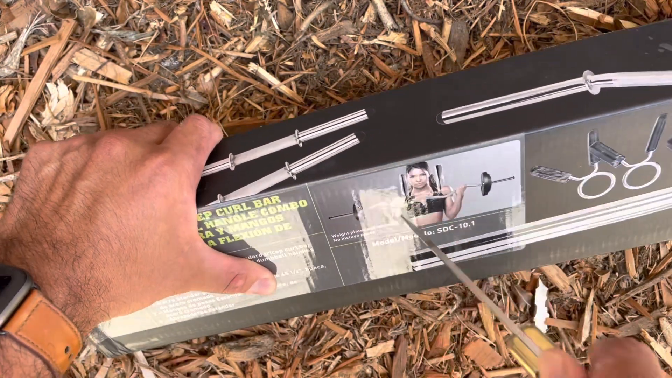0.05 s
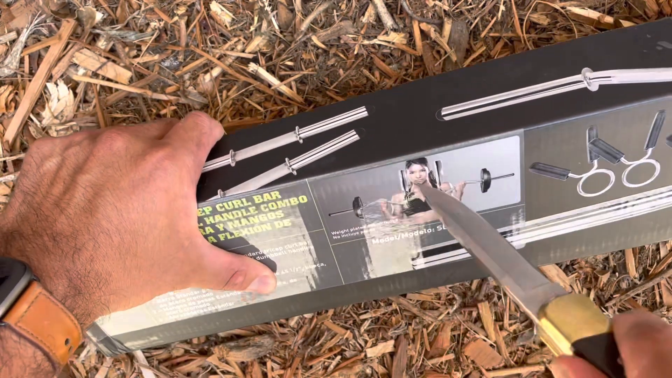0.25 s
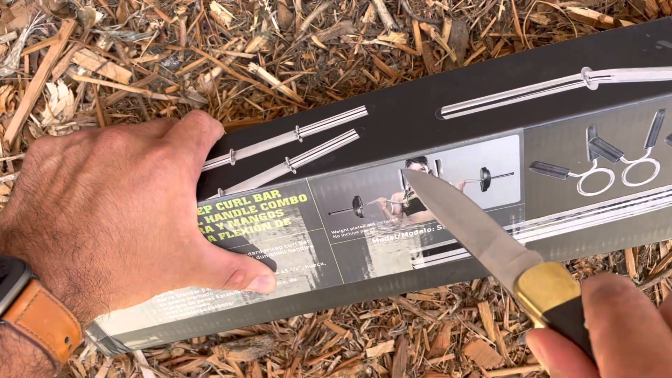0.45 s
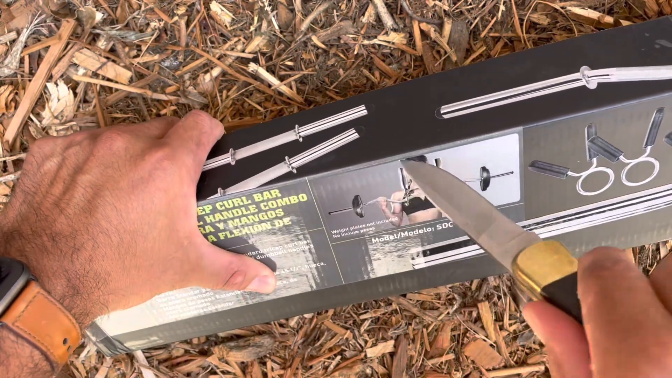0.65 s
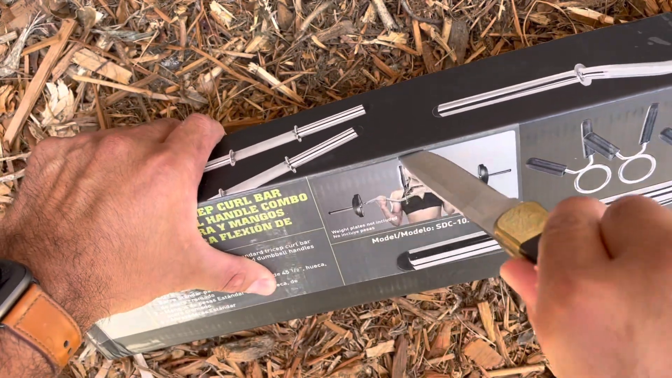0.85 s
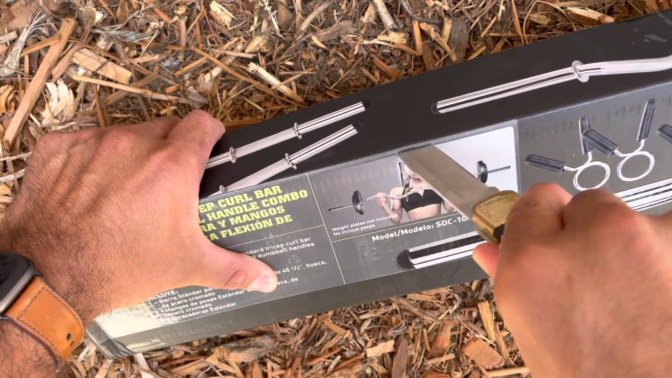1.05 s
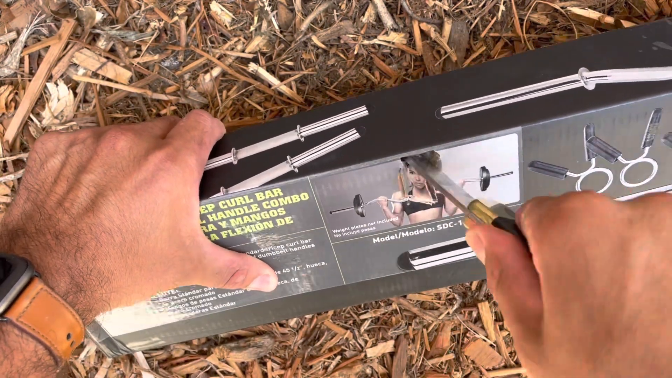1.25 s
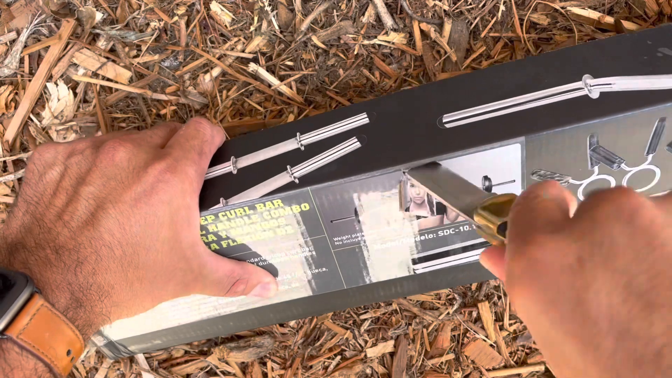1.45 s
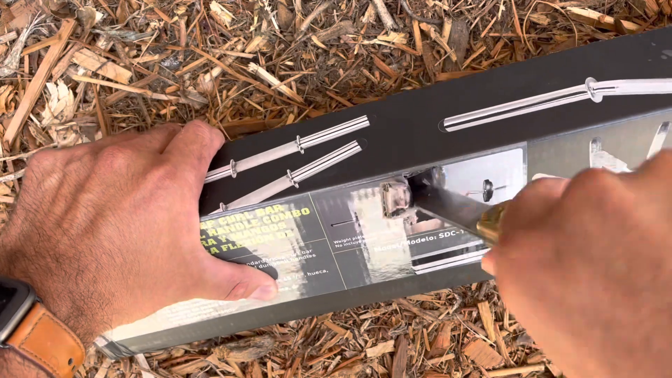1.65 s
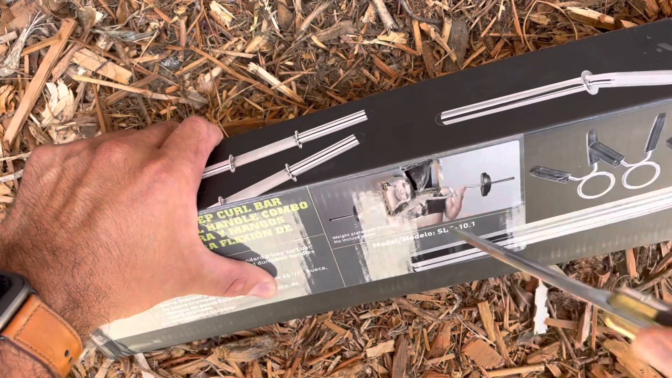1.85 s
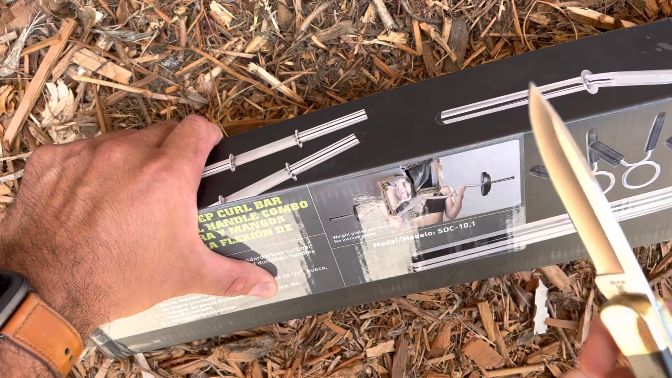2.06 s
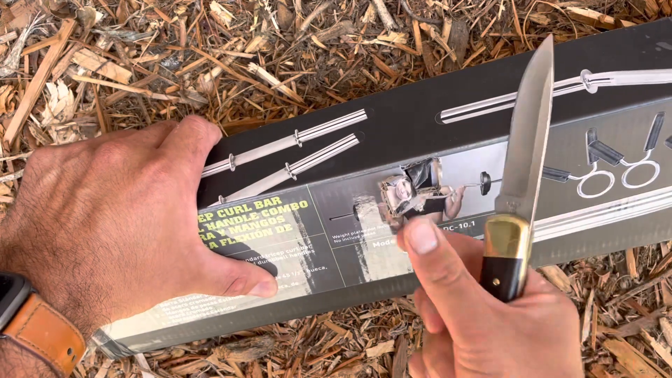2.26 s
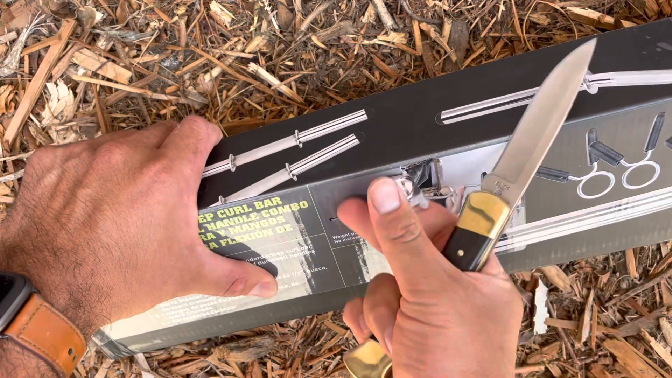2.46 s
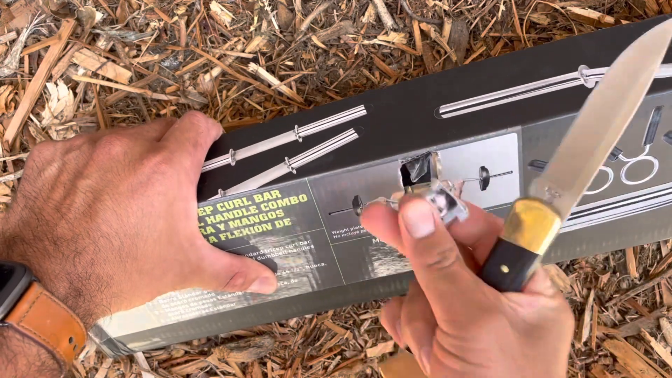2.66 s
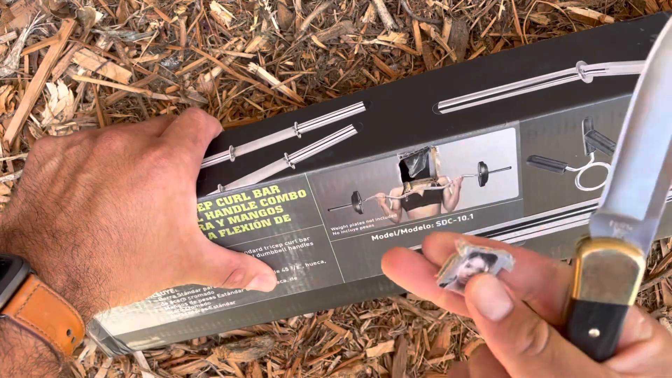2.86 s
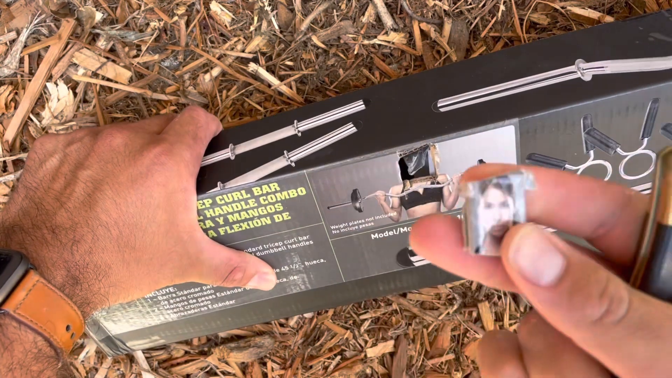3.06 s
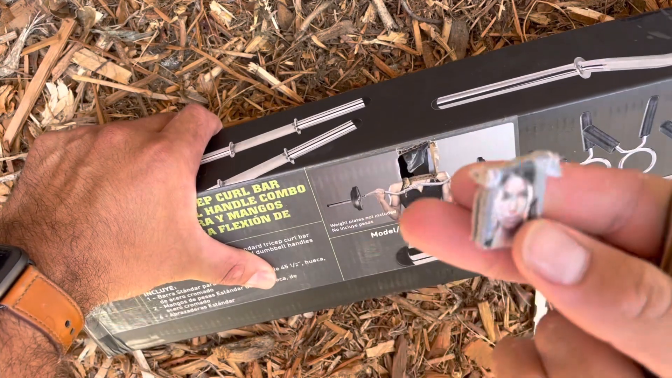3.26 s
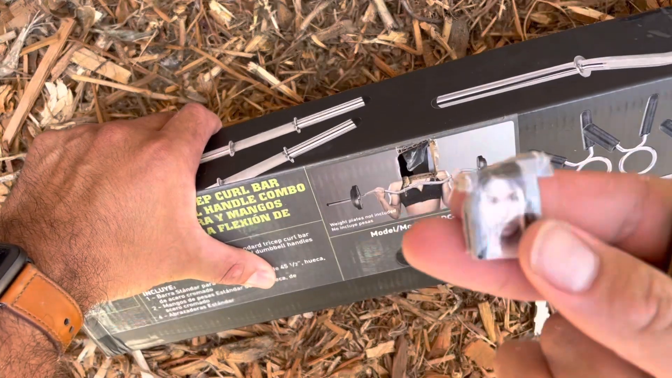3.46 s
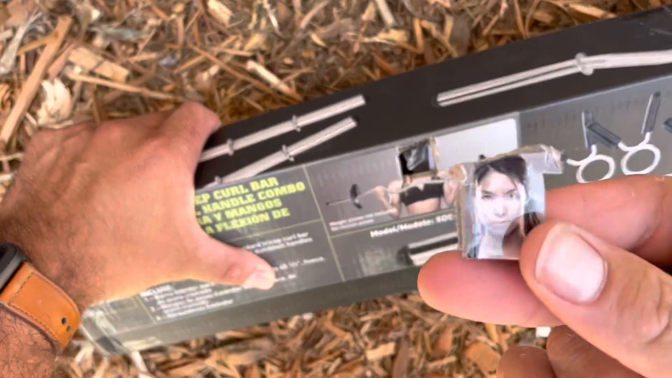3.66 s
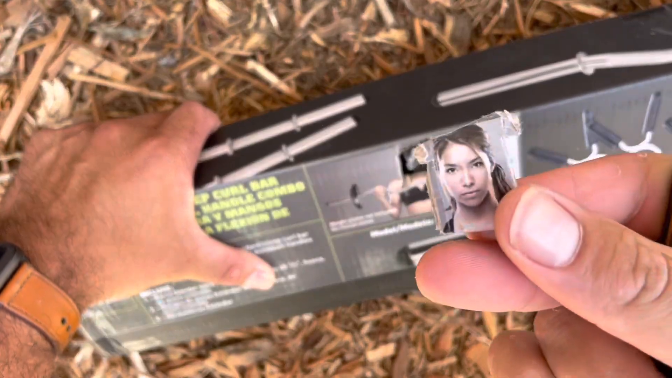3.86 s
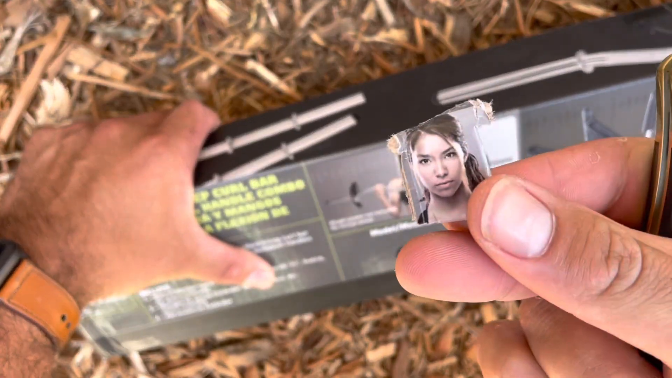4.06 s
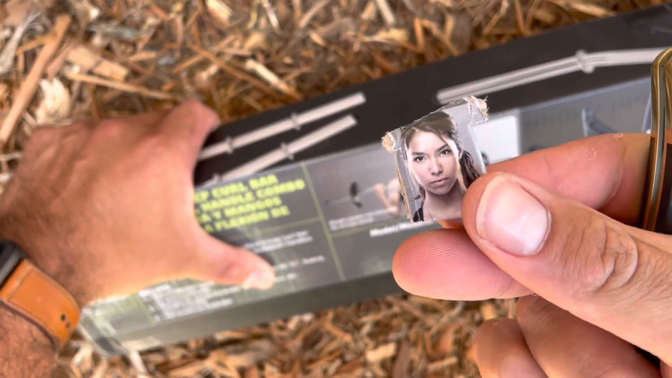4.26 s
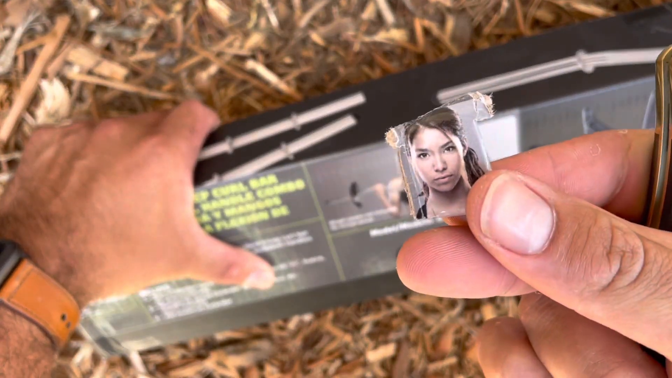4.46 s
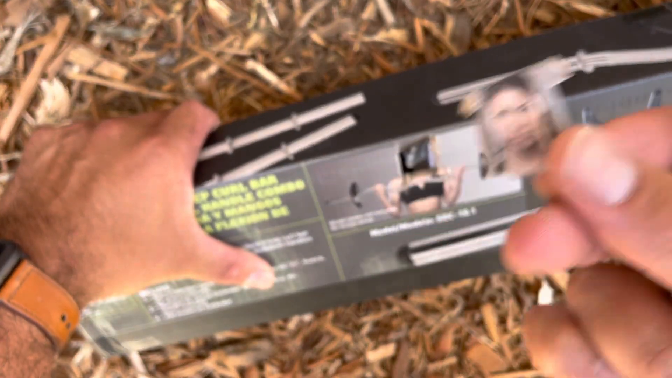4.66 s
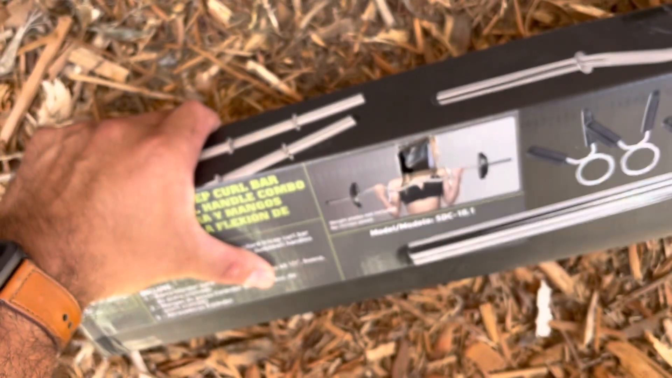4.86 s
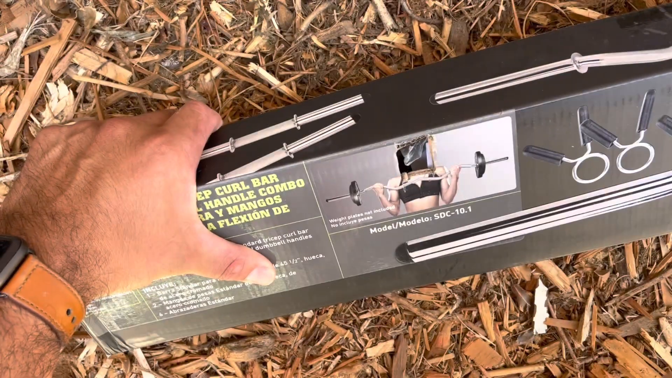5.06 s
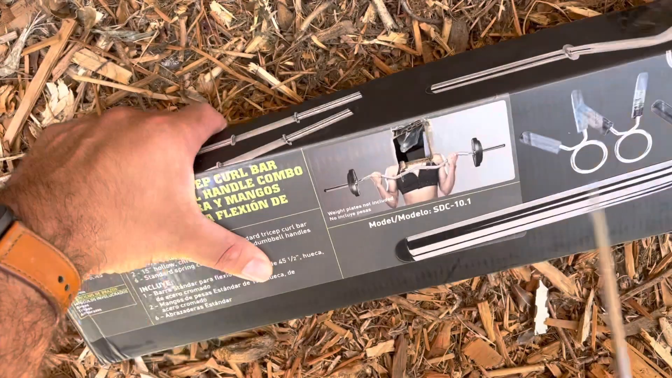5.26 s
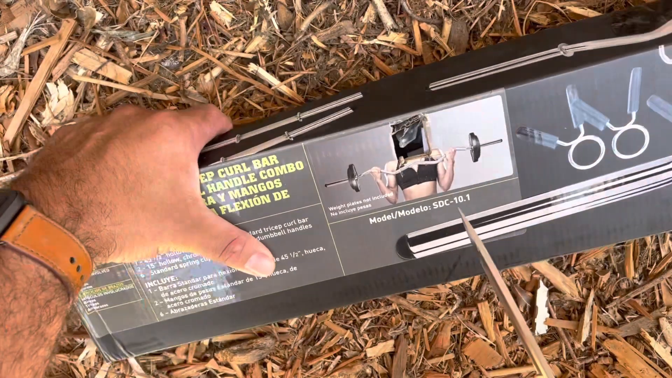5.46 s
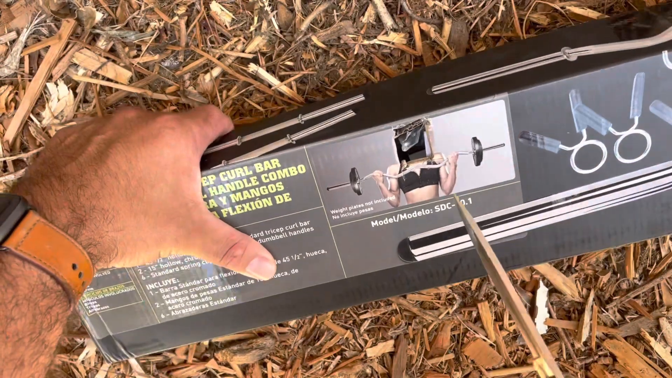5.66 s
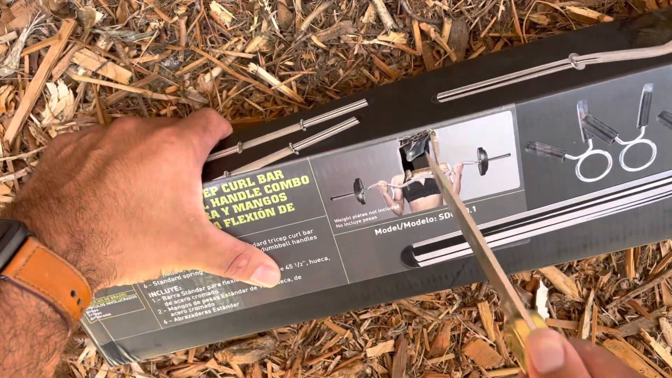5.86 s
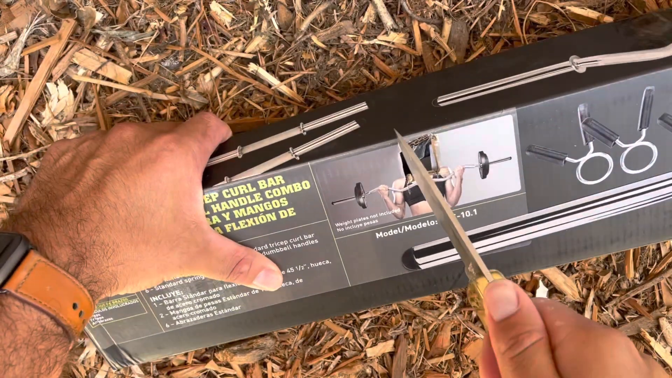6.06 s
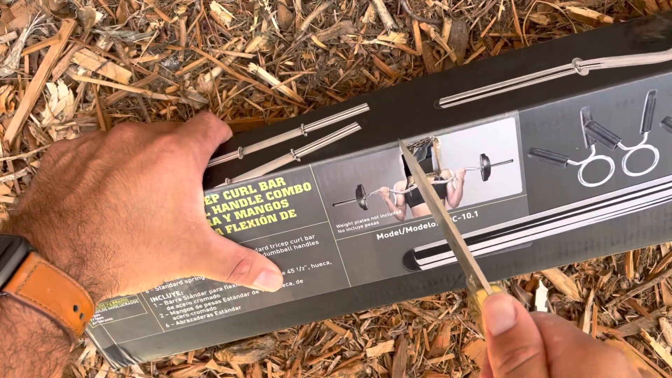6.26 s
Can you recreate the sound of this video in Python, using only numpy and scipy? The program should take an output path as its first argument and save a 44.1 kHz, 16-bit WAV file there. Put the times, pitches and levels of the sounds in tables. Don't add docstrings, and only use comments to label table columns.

```python
import sys
import numpy as np
from scipy import signal
from scipy.fft import rfft, irfft, next_fast_len
from scipy.io import wavfile

SR = 44100
rng = np.random.default_rng(int(sys.argv[2]) if len(sys.argv) > 2 else 0)


def nominal_scale(level):
    x = np.asarray(level, float) / 20
    return 10 ** x


def dump_mix(stems):
    frames = np.atleast_2d(stems).T
    limited = np.clip(frames, -1, 1)
    pcm = np.round(limited * 32767).astype(np.int16)
    wavfile.write(sys.argv[1], SR, pcm)


N = 277830

# (time [s], pressure [dB])
PRESSURE = [(0, -61), (.2, -67), (.46, -65.5), (.62, -64), (.78, -44), (.87, -39), (1.08, -32), (1.33, -51),
            (1.58, -47.5), (1.7, -48.5), (1.8, -66.5), (2.12, -76.5), (2.22, -57.5), (2.75, -71.5),
            (3.0, -95.5), (4.95, -95), (5.2, -56.5), (6.3, -66.5)]
# (time [s], level [dB])
SLIDE = [(0, -58), (.07, -71), (.5, -78), (.68, -60), (.8, -53.5), (1.0, -46.5), (1.57, -67), (1.69, -51),
         (1.8, -73), (2.19, -85), (2.35, -69.5), (3.05, -70), (3.2, -85), (3.56, -71.5), (3.85, -87),
         (4.92, -87), (5.2, -63.5), (6.3, -80.5)]
# (time [s], length [s], hiss [dB], extra weight on the panel [dB])
DRAGS = [(0, 0.005, -38, -3), (0.614, 0.067, -61.5, 5.5), (0.694, 0.035, -53, 7.5),
         (0.781, 0.083, -42, 4.5), (1.039, 0.047, -35.5, 0.5), (1.35, 0.04, -53.5, 5),
         (1.37, 0.14, -44, 2.5), (1.468, 0.011, -45.5, 8), (1.485, 0.039, -31, 6), (1.6, .07, -51.5, 1),
         (1.528, .025, -59.5, 17), (1.012, 0.027, -42, -1), (2.363, 0.11, -68, 0.5),
         (1.688, 0.026, -41.5, -1), (1.885, 0.092, -70, -3), (2.24, .06, -64, 9), (2.179, 0.11, -61, 2),
         (2.443, 0.039, -50.5, -3), (2.502, 0.029, -41.5, -9), (5.153, 0.051, -52, 7.5),
         (5.189, 0.078, -51, 4), (5.39, 0.085, -76.5, 7), (5.748, 0.051, -78, 7.5), (6.022, 0.1, -73.5, 1),
         (5.682, 0.057, -65.5, 7.5), (5.896, 0.015, -68, 12.5), (5.927, 0.027, -49.5, 1.5),
         (5.97, 0.047, -62, 2), (5.279, .11, -60, 4)]
# (time [s], pitch [Hz], level against the board [dB])
FLAP = [(.62, 2900, -8), (.8, 2886, -3), (1.0, 2925, -2), (1.1, 2680, -2), (1.3, 2620, -1), (1.47, 2600, 2),
        (1.58, 2500, -3), (1.66, 2050, -3), (2.18, 2300, -10), (2.4, 2400, -10), (5.17, 2200, -8),
        (5.21, 2150, -3), (5.36, 2080, -2), (5.45, 2050, -8), (5.75, 2000, -4), (6.3, 2100, -8)]
# (pitch [Hz], width [Hz], level [dB])
BOARD = [(1140, 400, 0.5), (1500, 150, 1), (1830, 188, -5), (2230, 250, -6)]
# (pitch [Hz], width [Hz], level [dB])
BOX = [(140.8, 7.7, 1), (203, 170, 6), (298, 130, 7), (467, 81, 1), (641, 110, -9), (850, 160, -9.5)]
# (pitch [Hz], width [Hz], level [dB])
SKIN = [(2670, 720, -5.5), (3370, 500, -2), (4000, 600, -3), (4700, 590, -1.5), (5750, 710, -2),
        (6937, 200, -4.5)]
# (frequency [Hz], level per Hz [dB])
SIZZLE = [(6300, -50), (6900, -9), (7800, -6), (8600, 0), (9600, 0), (11000, -4), (12800, -6), (14500, -7),
          (15900, -10), (16500, -60)]
# (time [s],
# peak [dB], ring [Hz], dull share [dB], panel share [dB])
SNAPS = [(1.0407, -16.5, 1125, 3.5, -12.5), (1.0806, -28, 2920, -14, -11), (1.112, -5.5, 2620, -38, -5.5),
         (1.1362, -16, 2633, -29, -6), (1.1588, -16, 2774, -15, -13), (1.1666, -14, 2505, -17.5, -10),
         (1.1745, -5, 5560, -12, -7.5), (1.1788, -5.5, 2650, -8.5, -8), (1.2075, -4.5, 2630, -40.5, -5),
         (1.2537, -12.5, 2526, -49.5, -4.5), (1.289, -23.5, 2617, -18, -5.5),
         (1.3284, -33.5, 2650, -19, -10), (1.39, -23.5, 2600, -35, -18.5), (1.4054, -22.5, 2509, -16, -17),
         (1.4342, -16, 1562, -24.5, -7), (1.4557, -23.5, 2775, -18, -10),
         (1.4876, -21.5, 2710, -12.5, -12.5), (1.4924, -13, 2295, -16.5, -12.5),
         (1.4992, -10, 2377, -23.5, -13), (1.4985, -18.5, 4300, -30, -14), (1.518, -11.5, 2877, -8.5, -9),
         (1.5279, -22.5, 1197, -18, -5.5), (1.5622, -22.5, 2555, -43, -10),
         (1.6205, -24.5, 4970, -10, -3.5), (1.6355, -38.5, 3900, -23, -8), (1.6855, -35, 1000, -10, -8.5),
         (1.6955, -30, 1270, 0.5, -9), (1.706, -36, 1930, -4, 3),
         (0.0094, -32, 3780, -2, -7), (0.4594, -41, 1280, -32, -3), (0.635, -33.5, 3550, -4, -11),
          (0.6639, -32.5, 1400, -3, -7), (0.6884, -36, 1080, -21, -7.5), (0.695, -39.5, 1120, -22, -17),
          (0.7218, -37, 1140, 0, -7.5), (0.7868, -28.5, 1140, -28, -12), (0.806, -30.5, 1130, -20, -16),
          (1.012, -32, 1134, -20, -10), (1.9105, -40, 2090, -18, -6.5), (2.1828, -30.5, 1160, 7.5, -4.5),
          (2.2372, -46.5, 1170, -21, -14), (2.3759, -50, 1180, -15, -15), (2.4063, -47, 1170, -22, -15),
          (2.4489, -37, 1160, -30, -13), (2.4635, -28, 5530, -13, -4.5), (2.4926, -37, 4400, -25, -8),
          (2.5068, -29, 4180, -39, 1), (2.5254, -24.5, 4600, -13.5, -7.5), (4.9945, -37.5, 1390, 13.5, -8),
          (5.1627, -36, 3850, -22, -3), (5.1766, -35, 1253, -7, 0), (5.223, -33.5, 2370, -2, -4),
          (5.229, -35.5, 4550, -12, -5), (5.2989, -50, 1980, -20, -14), (5.5583, -48, 2050, -20, -5),
          (5.6626, -50.5, 1780, -10, -10), (5.687, -35, 2060, -9, -1), (5.7114, -50, 1960, -5, -17),
          (5.7738, -57, 1860, -23, -16), (5.7838, -53, 1960, -23, -18), (5.8995, -40, 1940, -20, -10),
          (5.9364, -30.5, 1050, -44, -11.5), (5.9788, -48.5, 2320, -14, -7), (5.996, -44, 1500, -7, -1)]
# (pitch [Hz], width [Hz], level [dB])
PANEL = [(1530, 554, 8.5), (2650, 2700, 0), (4170, 230, 5.5), (6440, 1400, 1.5)]
# (time [s], peak [dB], pitch [Hz], time to fall 60 dB [s])
KNOCKS = [(0.463, -31, 112, 0.0085), (0.69, -33, 177, 0.033), (0.794, -31, 420, 0.093),
          (1.044, -19.5, 326, 0.0047), (1.047, -16, 165, 0.034), (1.055, -14, 135, 0.015),
          (1.114, -21, 424, 0.021), (1.177, -10, 264, 0.013), (1.211, -23, 267, 0.012),
          (1.256, -25, 294, 0.053), (1.426, -34, 116, 0.058), (1.501, -13.5, 213, 0.013),
          (1.522, -11, 622, 0.035), (1.53, -18, 700, .025), (1.179, -18, 520, .02), (1.185, -20, 330, .03),
          (1.08, -26, 250, .03), (1.459, -26, 260, .02), (1.489, -22, 330, .02), (1.699, -27, 300, .02),
          (1.51, -22, 250, .03), (5.225, -36, 300, .05), (5.255, -36, 330, .04), (1.02, -30, 370, .04),
          (.85, -32, 490, .05), (1.525, -11.5, 835, 0.021), (1.529, -15, 133, 0.035),
          (1.566, -24, 175.5, 0.0256), (1.696, -21, 670, 0.02), (2.184, -14.5, 328, 0.038),
          (2.193, -17, 110.4, 0.047), (2.472, -32.5, 134, 0.015), (5.159, -48.5, 251, 0.14),
          (5.194, -36, 594, 0.047), (5.935, -16, 304, 0.062), (5.946, -16.5, 136.7, 0.025)]
# (pitch [Hz], level [dB], time to fall 60 dB [s])
CHIP = [(577, -7, 0.046), (700, -20.5, 0.045), (844, -12, 0.034), (1280, -0.5, 0.019), (1545, -12, 0.037),
        (1650, -39, 0.11), (2030, -35, 0.089), (2285, -18, 0.11), (2600, -31, 0.034)]
# (time [s], level [dB])
CHIP_HITS = [
    (4.9952, -21),
    (4.998, -19.5),
    (5.0037, -34.5),
    (5.008, -39),
]
# (time [s], peak [dB], ring [Hz])
TICKS = [(0.1824, -50, 3060), (0.2261, -49, 2540), (0.5774, -63, 2790), (0.7539, -42, 2895),
         (1.2282, -25, 2576), (1.7344, -41, 2720), (1.9403, -47, 3068), (2.134, -49, 2920),
         (2.364, -58.5, 2650), (2.4344, -37.5, 4307), (2.4544, -32, 5900), (2.6782, -44.5, 4430),
         (2.804, -50, 6100), (2.9871, -48.5, 4900), (3.6096, -52, 5210), (3.8294, -60, 2930),
         (4.6683, -45, 6660), (5.0704, -44.5, 4040), (5.1316, -46.5, 5340), (5.341, -44, 2500),
         (5.3794, -52, 4500), (5.5585, -46, 5000), (5.5744, -45, 5250), (5.6639, -51, 5030),
         (5.7965, -48.5, 2980), (5.8699, -49.5, 3380), (5.9878, -45, 2570), (6.1544, -53.5, 4000),
         (6.2714, -46, 5050), (6.2896, -47, 3320),
         (0.0638, -46, 3320), (1.8715, -48, 2535), (2.0111, -49, 2600), (3.1685, -62, 2765),
          (3.231, -62.5, 2595), (4.5248, -54.5, 4840), (4.719, -72.5, 2810), (4.9273, -53.5, 4810),
          (4.9512, -56, 3000), (5.5844, -54, 5270), (3.0809, -63, 6030), (5.919, -47, 5170),
          (6.112, -58.5, 4000), (5.184, -37, 4400), (5.356, -50.5, 5080), (5.5358, -54, 1716),
          (0.0717, -49, 2900), (0.098, -55, 3500), (0.218, -56, 9000), (0.4918, -54, 6000),
          (0.537, -56, 8000), (0.578, -53, 5000), (1.817, -55, 3500), (1.8396, -55, 3500),
          (1.883, -53, 3000), (1.8929, -47, 4970), (1.941, -48, 11000), (1.955, -51, 9000),
          (1.9937, -56, 2570)]
# (time [s], length [s], level [dB], brightest [Hz], swelling share [0-1])
RUSTLES = [(2.669, 0.08, -60.5, 5400, 0.2), (2.914, 0.073, -59.5, 6000, .2),
           (2.984, 0.033, -61.5, 8800, 0.1), (3.024, .065, -72, 6000, 0.9),
           (3.412, 0.086, -75.5, 5050, .36), (3.55, 0.1, -64.5, 8200, 0.52), (4.522, 0.09, -72.5, 9800, .1),
           (4.658, 0.039, -75, 9810, .36), (4.933, 0.066, -86, 11000, .36), (5.82, 0.07, -79, 5200, .6),
           (6.055, 0.064, -78, 4300, 0.5), (6.173, 0.122, -68, 5000, 0.48)]
# (frequency [Hz], level per Hz [dB])
AIR = [(18, -41), (30, -27), (48, -3.5), (86, -11), (119, -3), (178, -21.5), (246, -23), (564, -37.5),
       (706, -27.5), (1080, -45), (1230, -32), (1420, -44), (2800, -54), (3790, -68), (12000, -87.5),
       (15600, -117), (22000, -120)]
# (frequency [Hz], likeness [-1 to 1])
AIR_LIKENESS = [(60, 0.81), (180, 0.85), (550, -0.71), (1650, 0.7), (4970, 0.86), (15000, 0.59)]
# (pitch [Hz], width [Hz], average level [dB])
RUMBLE = [(60, 9, -46), (105, 200, -57)]
# (frequency [Hz], left minus right [dB])
PORT_BALANCE = [(60, -3), (200, -2.5), (700, -1), (1300, 1.5), (2400, .3), (4400, 4), (6600, .3),
                (15000, .1)]
# (frequency [Hz], left leads by [rad])
PORT_PHASE = [(60, 0), (860, .6), (1810, .6), (3270, .9), (4700, .1), (6200, -1.6), (7000, -2.95),
              (8100, -3.3), (9000, -4.7), (10400, -6.1), (12100, -6.5), (12900, -8.), (13700, -9.2),
              (16200, -9.9)]


def rms_one(x):
    return x / np.sqrt(np.mean(x ** 2) + 1e-20)


def peak_one(x):
    return x / np.max(np.abs(x))


def add(out, s, piece):
    i = int(s * SR)
    out[i:i + len(piece)] += piece[:N - i]


def at_hz(points, hz):
    points = np.array(points)
    return np.interp(np.log(hz + 1), np.log(points[:, 0]), points[:, 1])


def in_time(rows, column=1):
    rows = np.array(rows)
    return np.interp(np.arange(N) / SR, rows[:, 0], rows[:, column])


def shaped(x, response):
    size = next_fast_len(N + 4096)
    hz = np.arange(size // 2 + 1) * SR / size
    return irfft(rfft(x, size) * response(hz), size)[..., :N]


def band_pass(x, low_hz, high_hz, order=2):
    return signal.sosfilt(signal.butter(order, [low_hz, high_hz], "band", fs=SR, output="sos"), x)


def drift(rate):
    r = np.exp(-80 * np.pi * rate / SR)
    slow = signal.lfilter([1], [1, -2 * r, r * r], rng.standard_normal(N // 40 + 2002))[2000:]
    return np.interp(np.arange(N) / 40, np.arange(len(slow)), rms_one(slow))


def resonate(x, hz, width_hz):
    r = np.exp(-np.pi * width_hz / SR)
    top = np.array([1, 0, -1]) * (1 - r * r) / 2
    return signal.lfilter(top, [1, -2 * r * np.cos(2 * np.pi * hz / SR), r * r], x)


def body(x, modes):
    return sum(nominal_scale(db) * resonate(x, hz, width) * (-1) ** k for k, (hz, width, db) in enumerate(modes))


def wandering(x, modes):
    out = np.zeros(N)
    for k, (hz, width, db) in enumerate(modes):
        strength = nominal_scale(db + 1.5 * drift(6))
        out += strength * resonate(x, hz, width) * (-1) ** k
    return out


def fibres(per_s, spread_db, clump_db):
    sizes = nominal_scale(spread_db * np.minimum(rng.exponential(1, N), 5)) * rng.choice([-1, 1], N)
    torn = sizes * (rng.random(N) < per_s / SR)
    clumps = nominal_scale(clump_db * (drift(40) + 6.0 * drift(160)))
    return clumps * (rms_one(torn) + 0.25 * rng.standard_normal(N))


def drags():
    panel, skin = np.zeros((2, N))
    for s, length, hiss_db, weight_db in DRAGS:
        u = np.arange(int((length + 0.02) * SR)) / SR
        bite = np.minimum(u / (0.149 * length), 1)
        sag_db = -4.5 * u / length
        release_db = -60 * np.maximum(u - length, 0) / 0.088
        shape = bite * nominal_scale(sag_db + release_db)
        add(panel, s, nominal_scale(hiss_db + weight_db) * shape)
        add(skin, s, nominal_scale(hiss_db) * shape)
    return panel, skin


def rubbing():
    panel_db = in_time(PRESSURE)
    hiss_db = in_time(SLIDE) + 2 * drift(12)
    box_db = -47 + 0.89 * (panel_db + 45)
    panel_drag, hiss_drag = drags()
    deep = fibres(per_s=4100.0, spread_db=0.5, clump_db=0.0)
    fine = fibres(per_s=3900.0, spread_db=1.0, clump_db=0.28)

    slow = signal.sosfilt(signal.butter(2, 280, fs=SR, output="sos"), deep)
    flap = slow * np.cos(2 * np.pi * np.cumsum(in_time(FLAP)) / SR)
    flap_share = nominal_scale(in_time(FLAP, column=2))

    panel = rms_one(rms_one(wandering(deep, BOARD)) + flap_share * rms_one(flap))
    box = rms_one(wandering(deep, BOX))
    brighter = signal.lfilter([1, -1], [1], fine)
    hiss = rms_one(wandering(brighter, SKIN))
    sizzle = rms_one(shaped(fine, lambda hz: nominal_scale(at_hz(SIZZLE, hz))))

    out = np.hypot(nominal_scale(box_db), 1.7 * panel_drag) * box
    out += np.hypot(nominal_scale(panel_db - 8.0), panel_drag) * panel
    out += np.hypot(nominal_scale(hiss_db - 1.5), hiss_drag) * hiss
    out += np.hypot(nominal_scale(hiss_db - 7), nominal_scale(-1) * hiss_drag) * sizzle
    return out


def snaps():
    out, t = np.zeros(N), np.arange(2600) / SR
    attack = 1 - np.exp(-t / .00015)
    fall = nominal_scale(-60 * t / .012) + nominal_scale(-20.5 - 60 * t / 0.079)
    for s, db, hz, dull_db, panel_db in SNAPS:
        burst = rng.standard_normal(len(t)) * attack * fall
        burst[8] += nominal_scale(7)
        near = [(f, width, level - 2.0 * abs(np.log2(f / hz))) for f, width, level in PANEL]
        spot = peak_one(resonate(burst, hz, 0.21 * hz))
        ring = peak_one(spot + nominal_scale(panel_db) * peak_one(body(burst, near)))
        ring += nominal_scale(dull_db) * peak_one(band_pass(burst, 500, 1300))
        sizzle_db = -15 + min(db + 13.5, 0)
        sizzle = nominal_scale(sizzle_db) * peak_one(band_pass(burst, 7000, 13800, order=3))
        add(out, s - .0002, nominal_scale(db + 0.5) * ring + sizzle)
    return out


def knocks():
    out, t = np.zeros(N), np.arange(6000) / SR
    for s, db, hz, t60 in KNOCKS:
        push = t * np.exp(-t * hz * 9)
        wall = peak_one(resonate(push, hz, 1.9 / t60))
        hollow = peak_one(body(push, BOX))
        add(out, s + 0.00091, nominal_scale(db) * peak_one(wall + .5 * hollow))
    return out


def chip():
    out, t = np.zeros(N), np.arange(4000) / SR
    attack = 1 - np.exp(-t / 0.00011)
    for s, db in CHIP_HITS:
        for hz, level_db, t60 in CHIP:
            own_db = rng.normal(0, 3)
            fall_db = -60 * t / min(t60, .03)
            strength = nominal_scale(db + 0.67 * level_db + own_db + fall_db)
            add(out, s, strength * attack * np.sin(2 * np.pi * hz * t))
    rattle = band_pass(rng.standard_normal(len(t)), 500, 3000)
    rattle_fall = nominal_scale(-25.5 - 60 * t / 0.01) + nominal_scale(-42.0 - 60 * t / 0.23)
    add(out, CHIP_HITS[0][0], rattle * rattle_fall)
    return out


def ticks():
    out, t = np.zeros(N), np.arange(900) / SR
    for s, db, hz in TICKS:
        burst = rng.standard_normal(len(t)) * nominal_scale(-60 * t / .017)
        ring = peak_one(resonate(burst, hz, 0.8 * hz))
        bright = peak_one(signal.lfilter([1, -2, 1], [1], burst))
        add(out, s, nominal_scale(db + 0.5) * peak_one(ring + 0.3 * bright))
    return out


def rustles():
    out, fine = np.zeros(N), fibres(per_s=8200.0, spread_db=-1.5, clump_db=0.4)
    broad = rms_one(band_pass(fine, 3800, 13000))
    for s, length, db, hz, rise in RUSTLES:
        i = int(s * SR)
        u = np.arange(int(length * SR)) / (length * SR)
        part = slice(i, i + len(u))
        swell = np.sin(np.pi / 2 * np.interp(u, [0, np.clip(rise, .02, .95), 1], [0, 1, 0]))
        width_hz = 0.45 * hz
        band = resonate(resonate(fine[part], hz, width_hz), hz, width_hz)
        add(out, s, nominal_scale(db) * swell * (rms_one(band) + nominal_scale(1) * broad[part]))
    return out


def ports(x):
    def pair(hz):
        left = nominal_scale(at_hz(PORT_BALANCE, hz) / 2) * np.exp(.5j * at_hz(PORT_PHASE, hz))
        return np.array([left, 1 / left])
    late = np.roll(x, 57)
    scattered = np.tanh(drift(25)) * band_pass(late, 300, 9000)
    return shaped(x, pair) + nominal_scale(-8) * scattered * [[1], [-1]]


def outdoors():
    def alike(hz):
        return np.clip(at_hz(AIR_LIKENESS, hz), -.9, .99)
    mid, side = rng.standard_normal((2, N))
    mid = shaped(mid, lambda hz: nominal_scale(at_hz(AIR, hz)) * np.sqrt(1 + alike(hz)))
    side = shaped(side, lambda hz: nominal_scale(at_hz(AIR, hz)) * np.sqrt(1 - alike(hz)))
    air = nominal_scale(-43.5 + drift(1.0)) * rms_one(mid + side * [[1], [-1]])
    for hz, width, db in RUMBLE:
        hum = resonate(resonate(rng.standard_normal(N), hz, width), hz, width)
        air = air + nominal_scale(db) * rms_one(hum)
    return air * nominal_scale([[-1.4], [1.4]])


def scene():
    cracks = snaps()
    near = rubbing() + cracks + knocks() + chip() + ticks() + rustles()
    uncancelled = resonate(cracks, 8400, 1300)
    return ports(near) + uncancelled + outdoors()


def roll_off(x):
    return signal.sosfilt(signal.butter(12, 16600, fs=SR, output="sos"), x)


def record(dry):
    bass_cut = signal.butter(4, 43, "high", fs=SR, output="sos")
    heard = 1.1 * np.tanh(signal.sosfilt(bass_cut, dry) / 1.1)
    return roll_off(heard)


dry = scene()
out = record(dry)
dump_mix(out)
```